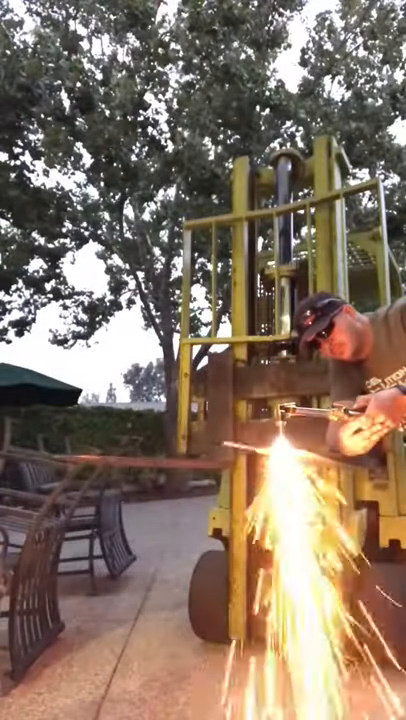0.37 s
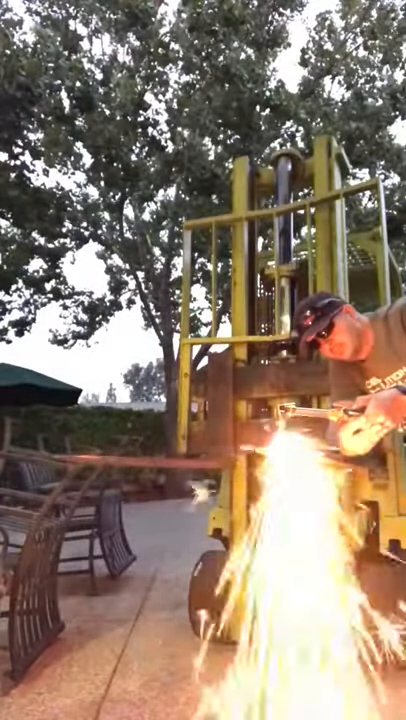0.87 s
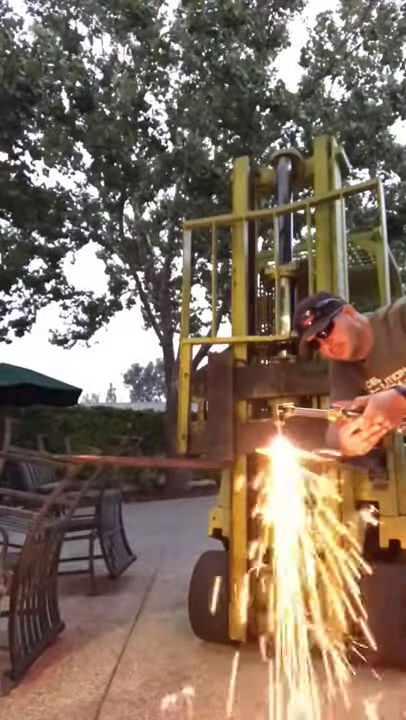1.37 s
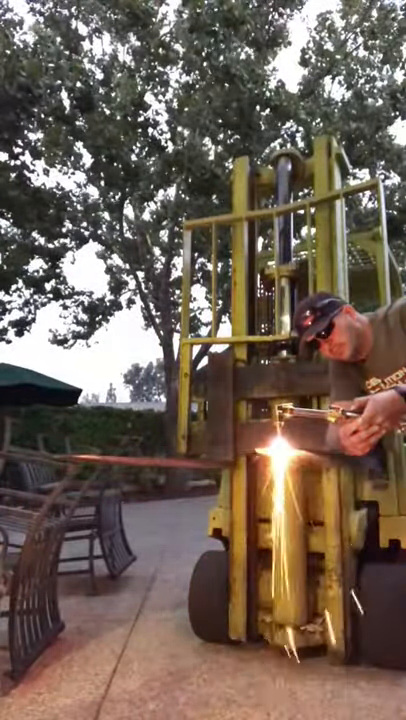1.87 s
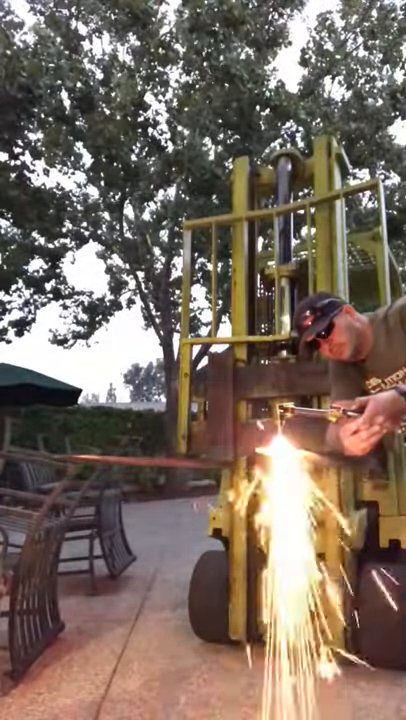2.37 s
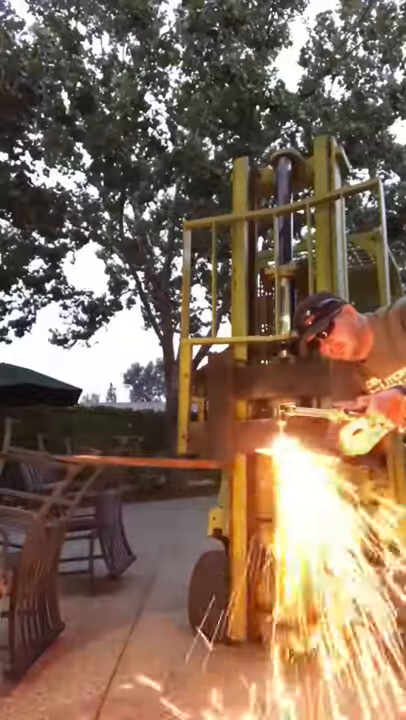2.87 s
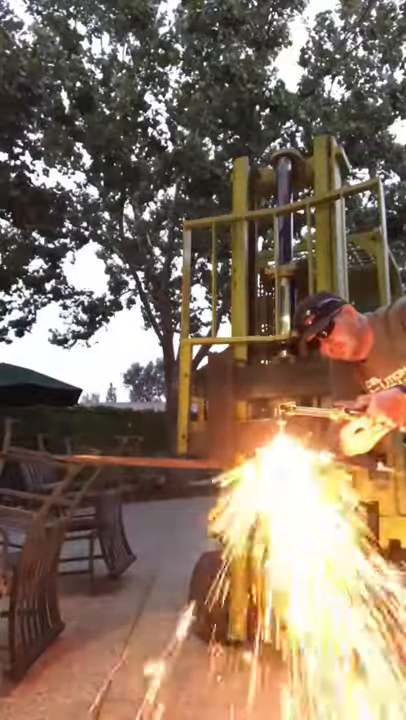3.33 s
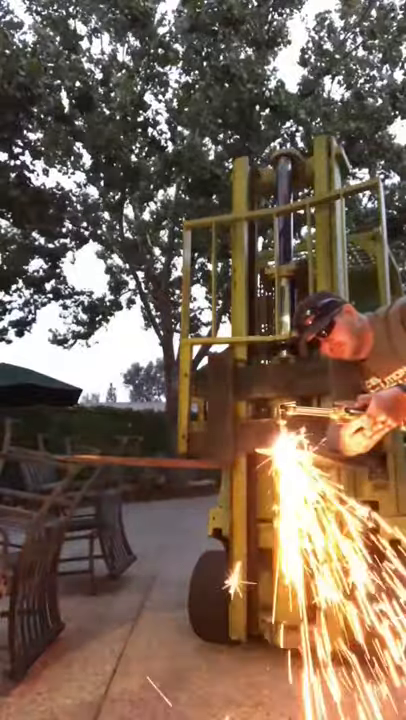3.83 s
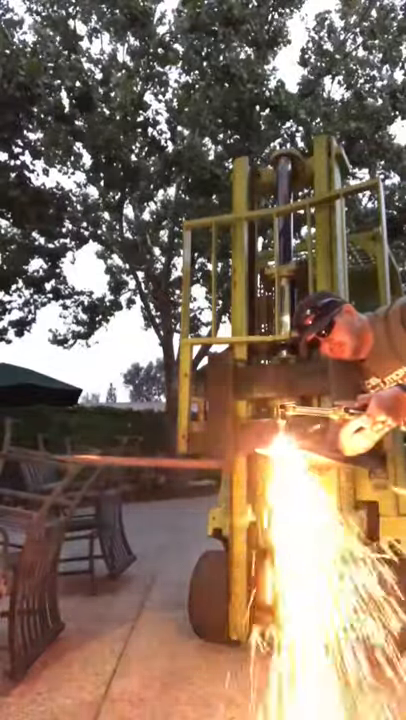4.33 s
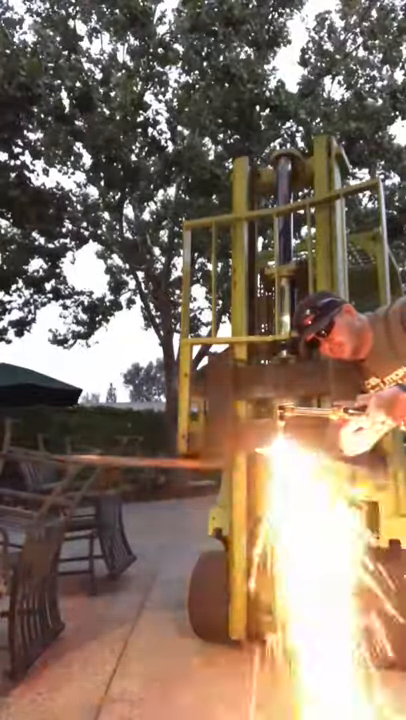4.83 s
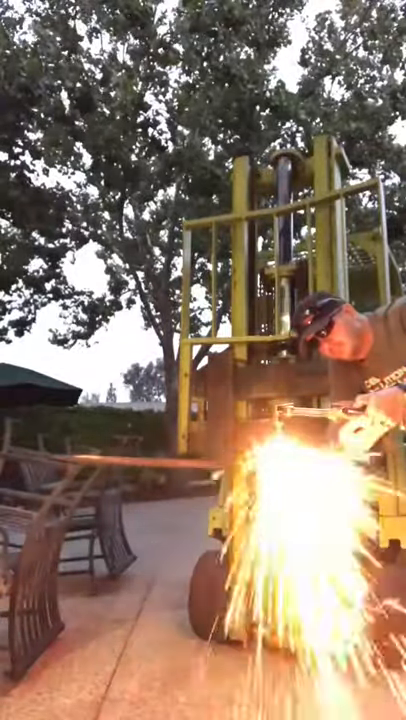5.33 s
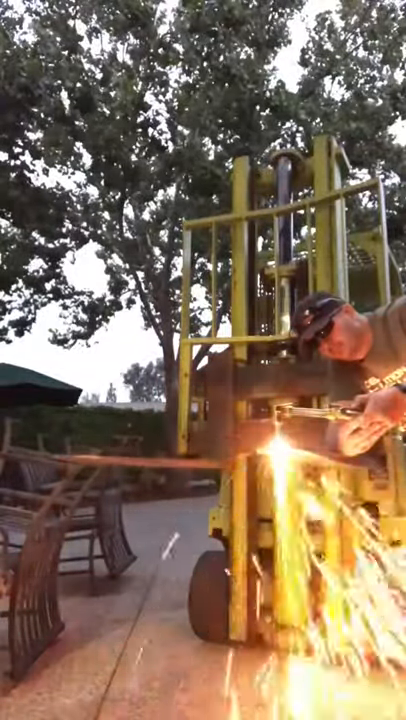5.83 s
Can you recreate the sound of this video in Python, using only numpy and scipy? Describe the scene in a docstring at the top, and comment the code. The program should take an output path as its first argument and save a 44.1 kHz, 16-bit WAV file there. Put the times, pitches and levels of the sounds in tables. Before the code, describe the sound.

Continuous harsh gas-jet hiss over a fluttering roar, swelling in short bursts and dotted with soft low pops, in an open yard.

```python
"""An oxy-fuel torch cuts thick steel in a paved yard, a few metres from one microphone.
The flame rumbles, the oxygen jet roars in the slot and hisses at the nozzle: five flickering noise bands.
Molten slag blows out in puffs, each a short two-tone ring with a spit of noise.
Frame and paving colour torch and slag with peaks, dips and faint echoes.
Under it lie far traffic, as low noise, and two wavering sine hums."""
import sys
import numpy as np
from scipy import signal
from scipy.fft import rfft, irfft, next_fast_len
from scipy.io import wavfile
from scipy.ndimage import uniform_filter1d

SR = 44100
rng = np.random.default_rng(int(sys.argv[2]) if len(sys.argv) > 2 else 0)


def store_pcm(level_fs):
    """Save levels as 16-bit WAV."""
    pcm = np.round(np.clip(level_fs, -1, 1) * 32767).astype(np.int16)
    wavfile.write(sys.argv[1], SR, np.atleast_2d(pcm).T)


def nominal_scale(level):
    """Amplitude ratio for a level in decibels (scalar or array-like)."""
    x = np.asarray(level, float) / 20
    return 10 ** x


N = 262393
SIZE = next_fast_len(N)
HZ = np.maximum(np.fft.rfftfreq(SIZE, 1 / SR), 1)


def colour(x, db):
    """Filter by a gain in dB given for every frequency bin."""
    return irfft(rfft(x, SIZE) * nominal_scale(db), SIZE)[:N]


def shape(table):
    """Level in dB of a source colour at every bin, silent (-90 dB) outside its table."""
    hz, db = np.transpose(table)
    return np.interp(np.log(HZ), np.log(hz), db, left=-90, right=-90)


def unit(x):
    """Scale to rms 1."""
    return x / np.sqrt(np.mean(x ** 2))


def walk(rate):
    """Random levels held 1 / rate s and slewed twice; spread near 1."""
    hold = int(SR / rate)
    steps = np.repeat(rng.standard_normal(N // hold + 1), hold)
    slewed = uniform_filter1d(uniform_filter1d(steps, hold), hold)
    return unit(slewed[:N])


def curves(table):
    """Every column after the time, drawn as one value a sample."""
    s, *columns = np.transpose(table)
    return (np.interp(np.arange(N) / SR, s, column) for column in columns)


def bumps(table, lead=0):
    """Sum of bell-shaped level moves in dB, each moved ahead by lead times its length."""
    t = np.arange(N) / SR
    return sum(db * np.exp(-.5 * ((t - s + lead * length) / (length / 2)) ** 2) for s, db, length in table)


def turbulence(table, shared_db, flicker_db, flicker_rate, count=4):
    """Noise in narrow bands, count an octave; all follow the shared unrest, each also flickers alone."""
    place, out = count * np.log2(HZ), 0
    spectrum = rfft(rng.standard_normal(SIZE)) * nominal_scale(shape(table))
    lowest, highest = count * np.log2(table[0][0]), count * np.log2(table[-1][0])
    for mid in np.arange(np.floor(lowest), highest + 1):
        window = np.cos(np.pi / 2 * np.clip(place - mid, -1, 1)) ** 2
        band = irfft(spectrum * window, SIZE)[:N]
        out = out + band * nominal_scale(shared_db + flicker_db * walk(flicker_rate))
    return unit(out)


# colours of the five regions of the jet, low to high: (frequency [Hz], level per Hz [dB])
FLAME_COLOUR = [(150, -7.5), (250, -2.5), (400, 1), (560, -1.5), (800, -3), (1100, -10.5), (2000, -30)]
ROAR_COLOUR = [(600, -25), (950, -6.5), (1300, 0), (1700, -1.5), (2000, -8), (2600, -39)]
RUSH_COLOUR = [(1300, -48), (1700, -13), (2050, 0.5), (2600, -2), (3300, -8.5), (4500, -44)]
HISS_COLOUR = [(2500, -10.5), (3400, -6), (3800, -1.5), (4600, -0.5), (5200, -5), (6700, -1.5),
               (7500, -7.5), (9500, -17)]
TOP_COLOUR = [(6500, -9), (8000, -2.5), (9000, -1), (10300, -8.5), (11200, -3.5), (12100, -6.5),
              (13500, -6.5), (16000, -10.5)]
# how each region answers the torch:
# (base level [dB], jet strength [dB per dB], clogging [dB per dB], surge [dB per dB])
FLAME_RESPONSE = (-53, 0.34, 0.56, 0.23)
ROAR_RESPONSE = (-44, 1.13, 1, 0.91)
RUSH_RESPONSE = (-43, 1.04, 0.46, 1)
HISS_RESPONSE = (-38.5, 1, 0.04, 0.33)
TOP_RESPONSE = (-46, 0.98, 0, 0.2)
# hand on the torch: (time [s], oxygen jet strength [dB], melt clogging the slot, as extra roar [dB])
HAND = [(0, -0.5, -1), (.5, 0, -1.5), (.76, -2, -1), (.9, 0, 0.5), (1.1, -0.4, 2), (1.35, -1.2, 3),
        (1.55, -0.8, 2.5), (1.75, 0.5, 2.1), (2.1, 1.5, -0.5), (2.45, 0, 2.5), (2.67, -0.5, -1.5),
        (2.9, 1.1, -1), (3.2, 1, -2.5), (3.38, -0.8, 0.7), (3.62, -0.1, 0.3), (3.75, 0.8, -2),
        (3.95, 1, -1.5), (4.18, 0.5, 0), (4.45, 0, -1), (4.6, 1, -3.5), (4.85, 1.5, -1.5), (4.98, -1, .6),
        (5.2, 0.7, -1.5), (5.4, -1, -2), (5.52, -1, -2.5), (5.65, -2, 3.5), (5.75, -2, -1.5),
        (5.8, 2, -0.2), (5.95, 2, 0.5)]
# the jet surges as it breaks through the melt: (time [s], surge [dB], length [s])
JET_SURGES = [(.065, 2.5, 0.047), (.92, 1, 0.045), (1.85, -0.5, 0.036), (2.6, 3, .04), (2.77, 3, 0.1),
              (2.88, 3.5, 0.026), (3.0, 3, .05), (3.31, 5, 0.051), (4.01, 3, 0.017), (4.09, 3.5, 0.04),
              (4.32, 2, .08), (4.89, 4, .05)]


def torch():
    """Five regions of jet noise follow one hand, its surges, and one sputter of melt closing the slot."""
    jet_db, clog_db = curves(HAND)
    # the jet is choked just before each surge: share of its depth, and lead in surge lengths
    choke_share, choke_lead = 0.3, 0.78
    surge_db = bumps(JET_SURGES) - choke_share * bumps(JET_SURGES, lead=choke_lead)

    sputter, flutter = walk(35), walk(90)
    roar = turbulence(ROAR_COLOUR, 0.24 * sputter + 0.34 * flutter, 1.8, 28, count=8)
    rush = turbulence(RUSH_COLOUR, 0.23 * sputter + 0.5 * flutter, 2.0, 28, count=10)
    hiss = turbulence(HISS_COLOUR, 0.16 * sputter + 0.3 * flutter, 0.99, 27.96, count=10)
    top = turbulence(TOP_COLOUR, 0.3 * sputter + 0.27 * flutter, 0.75, 27.96, count=8)
    flame = turbulence(FLAME_COLOUR, 0.21 * sputter + 0.47 * flutter, 0.85, 24.99)

    # the highest hiss fades faster as the slot clogs and follows the jet less
    thinnest_hz, db_per_clog, db_per_jet = 13000, -0.47, -0.1
    thinnest = colour(top, np.clip(12 * np.log2(HZ / thinnest_hz), -60, 0))
    top = top + (nominal_scale(db_per_clog * clog_db + db_per_jet * jet_db) - 1) * thinnest

    regions = [(roar, ROAR_RESPONSE), (rush, RUSH_RESPONSE), (hiss, HISS_RESPONSE),
               (top, TOP_RESPONSE), (flame, FLAME_RESPONSE)]
    mix = 0
    for noise, (base_db, jet, clog, surge) in regions:
        mix = mix + noise * nominal_scale(base_db + jet * jet_db + clog * clog_db + surge * surge_db)
    return mix


# colour of the far traffic: (frequency [Hz], level per Hz [dB])
TRAFFIC_COLOUR = [(25, -28), (40, -8), (55, -1), (130, -0.5), (180, -11), (400, -26), (1000, -23)]
# the hum swells now and then: (time [s], rise [dB], length [s])
HUM_RISES = [(.2, 11.5, .15), (.55, 5, .2), (2.2, 3, 0.18), (.9, 12, 0.18), (1.36, 13.5, .3),
             (2.53, 11.5, 0.19), (3.0, 6, .2), (3.23, 8, .08), (3.53, 9, 0.082), (4.12, 8.5, 0.28),
             (4.39, 9, 0.077), (4.68, 10, .3), (5.2, 4, 0.087), (5.48, 10, 0.13), (5.86, 8, .2)]
# the lower hum fades in: (time [s], level [dB])
LOW_HUM_FADE = [(0, -84), (4.6, -80), (5.0, -70), (5.95, -66)]


def yard():
    """Far traffic noise that slowly grows, a hum wavering in level and pitch, and a lower one late on."""
    traffic_db, growth_db_per_s, wander_db = -62, 0.6, 2
    rumble_db = traffic_db + growth_db_per_s * np.arange(N) / SR + wander_db * walk(4.94)
    rumble = turbulence(TRAFFIC_COLOUR, 0, 0.5, 6)

    hum_hz, low_hum_hz = 139.8, 99.7  # mean pitches
    hum_db = -72 + bumps(HUM_RISES) + 1.2 * walk(8)
    hum = np.sqrt(2) * np.sin(2 * np.pi * np.cumsum(hum_hz + 2.46 * walk(7)) / SR)
    low_hum = np.sqrt(2) * np.sin(2 * np.pi * np.cumsum(low_hum_hz + 1.6 * walk(4.3)) / SR)
    low_hum_db, = curves(LOW_HUM_FADE)
    return nominal_scale(rumble_db) * rumble + nominal_scale(hum_db) * hum + nominal_scale(low_hum_db) * low_hum


# slag blown out of the slot:
# (time [s], level [dB], length [s], gas pocket pitch [Hz], overtone against the pocket tone [dB])
SLAG_PUFFS = [(1.543, -40, 0.0071, 400, -16), (2.439, -46, .008, 400, -6), (2.722, -44, 0.0044, 380, -4),
              (2.759, -43.5, .006, 480, 3), (3.287, -42, 0.0071, 380, -8), (3.323, -40.5, 0.014, 330, -6),
              (4.054, -41, 0.013, 390, -10), (4.072, -42, .008, 380, -12), (4.083, -34, 0.0062, 427, -8),
              (4.345, -38.5, 0.0053, 427, -1), (4.596, -47, 0.021, 356, -3), (4.877, -46, 0.0048, 450, -1),
              (4.898, -46, 0.0049, 424, -4), (5.676, -53, .008, 420, 7), (5.781, -41, .007, 326, -1)]


def slag(overtone=2.02, spit_db=-4, spit_tilt_db=-3.0):
    """Each pop briefly rings the gas pocket in the slot and its overtone, with a spit of noise."""
    t, out = np.arange(N) / SR, 0
    octaves = np.log2(HZ / 450)
    tilt_db = np.where(octaves > 0, spit_tilt_db, 18) * octaves  # falls both ways from 450 Hz
    spit = nominal_scale(spit_db) * unit(colour(rng.standard_normal(N), tilt_db))
    phases = rng.uniform(0, 2 * np.pi, (len(SLAG_PUFFS), 2))
    for (s, db, length, hz, upper_db), phase in zip(SLAG_PUFFS, phases):
        swell = np.exp(-.5 * ((t - s) / (length / 2.75)) ** 2)
        turn = 2 * np.pi * hz * (t - s)
        ring = np.sin(turn + phase[0]) + nominal_scale(upper_db) * np.sin(overtone * turn + phase[1])
        out = out + nominal_scale(db) * swell * (ring + spit)
    return out


# reflections off frame and paving add or cancel: (frequency [Hz], width [Hz], gain [dB])
REFLECTIONS = [(692, 136, -2), (836, 22, 5.5), (875, 24, -0.5), (1020, 21, -4), (1326, 66, 3.5),
               (1484, 89, -4), (1600, 135, 3), (1794, 54, -2), (1130, 46, -1.5), (2060, 200, 2),
               (2270, 56, 2), (2426, 89, 4), (2684, 74, -6), (2570, 60, 1.5), (3150, 56, 4),
               (3219, 244, -14), (3674, 66, 7), (3640, 90, 1.5), (4120, 32, 7), (4260, 60, 2.5),
               (4420, 69, 1.5), (4880, 96, -4), (5000, 94, -4), (5580, 150, 1.5), (6370, 120, 1),
               (6600, 150, 0), (7120, 120, 3), (7750, 140, -4.5), (7900, 120, 2.5), (8130, 93, -6),
               (8700, 130, 1.5)]


def surroundings(x, scatter_db, drift, first_s=0.0028, t60_s=0.048):
    """Peaks and dips slide a little as the torch moves, then weak echoes ripple the spectrum finely."""
    ends = []
    for shift in (1 + drift, 1 - drift):
        path_db = sum(db * np.exp(-.5 * ((HZ * shift - hz) / (width / 2)) ** 2)
                      for hz, width, db in REFLECTIONS)
        ends.append(colour(x, path_db))
    low, high = ends
    place = .5 + .5 * np.tanh(walk(3.67))

    t = np.arange(SR // 5) / SR
    echoes = rng.standard_normal(len(t)) * (t > first_s) * nominal_scale(-60 * t / t60_s)
    echoes *= nominal_scale(scatter_db) / np.sqrt(np.sum(echoes ** 2))
    echoes[0] = 1  # direct sound
    return signal.fftconvolve(place * high + (1 - place) * low, echoes)[:N]


def hollow(x, hz=3220, width=330, waver_db=2.3, rate=40):
    """The deepest cancellation is touchy: hot air and the moving hand make its depth waver."""
    share = np.exp(-.5 * ((HZ - hz) / (width / 2)) ** 2)
    band = irfft(rfft(x, SIZE) * share, SIZE)[:N]
    return x + (nominal_scale(waver_db * walk(rate)) - 1) * band


def scene():
    """Torch and slag pass the reflections, the yard does not; one microphone feeds both channels."""
    near = surroundings(torch() + slag(), scatter_db=-18, drift=.004)
    return np.tile(hollow(near) + yard(), (2, 1))


def band_limit(x):
    """A steep low-pass at the top of the band."""
    return signal.sosfilt(signal.butter(12, 16820, fs=SR, output="sos"), x)


def record(dry):
    """The microphone's band ends sharply at the top."""
    band_edge_hz = 15730
    cut_db = np.clip((band_edge_hz - HZ) / 2, -90, 0)
    mix = np.array([colour(x, cut_db) for x in dry])
    return band_limit(mix)


dry = scene()
out = record(dry)
store_pcm(out)
```